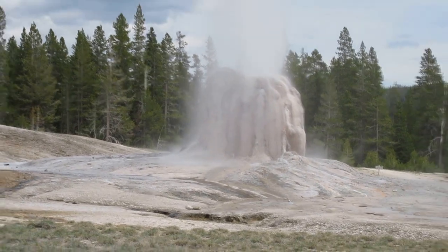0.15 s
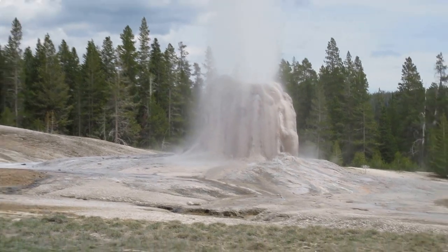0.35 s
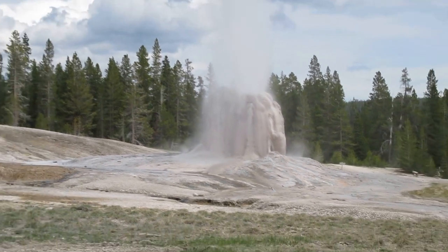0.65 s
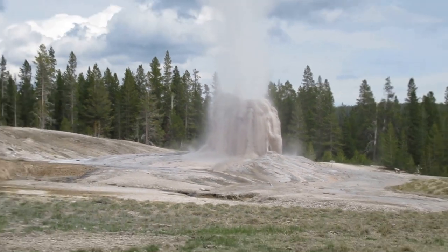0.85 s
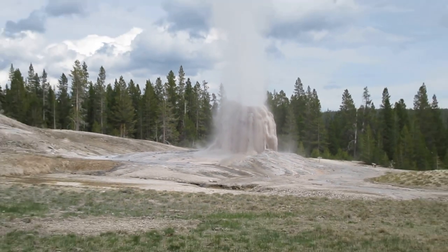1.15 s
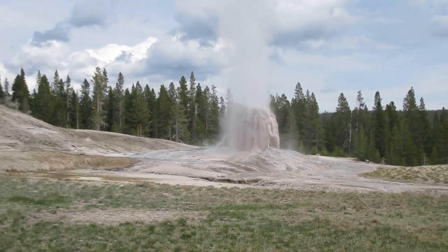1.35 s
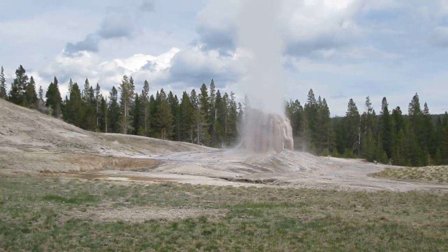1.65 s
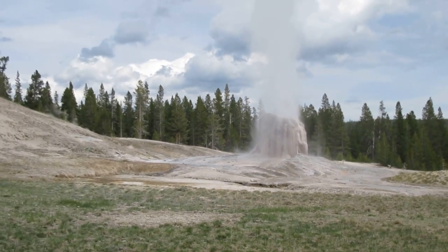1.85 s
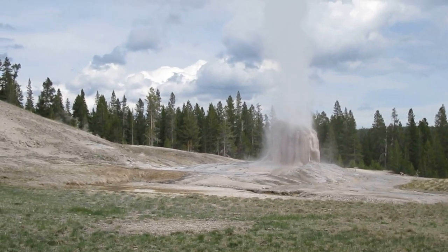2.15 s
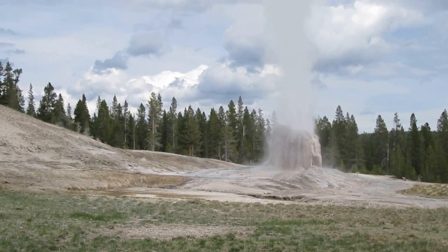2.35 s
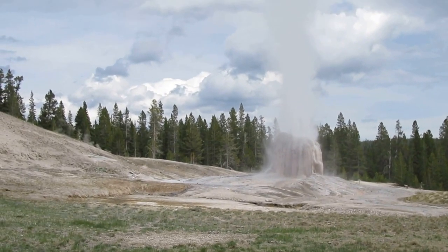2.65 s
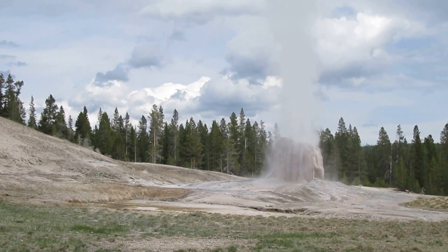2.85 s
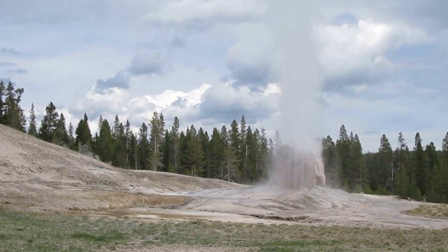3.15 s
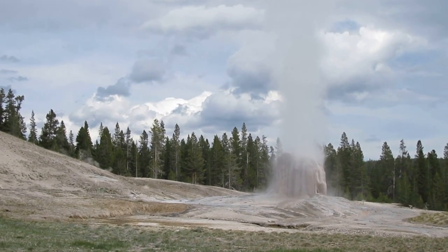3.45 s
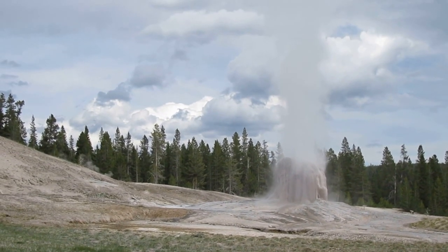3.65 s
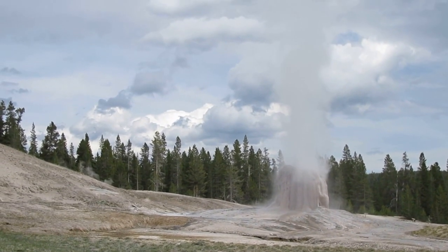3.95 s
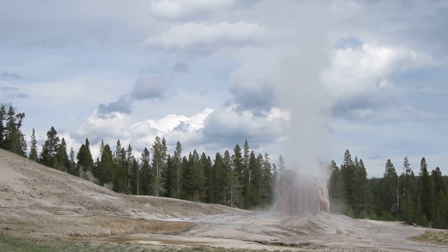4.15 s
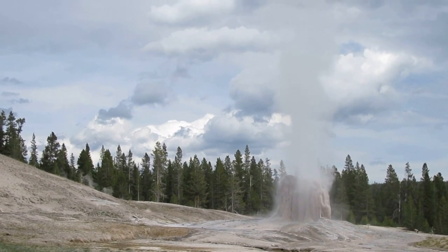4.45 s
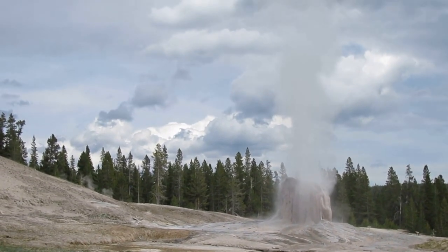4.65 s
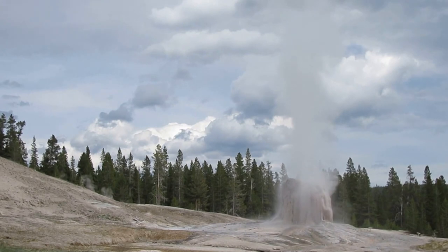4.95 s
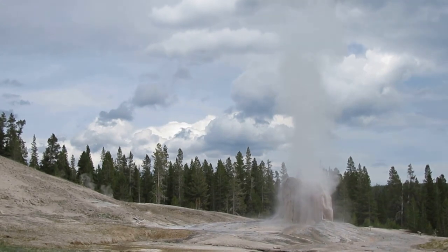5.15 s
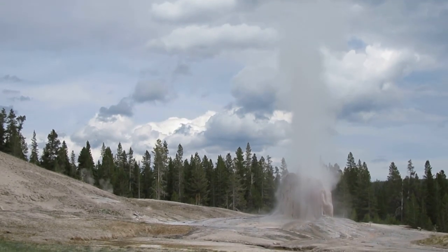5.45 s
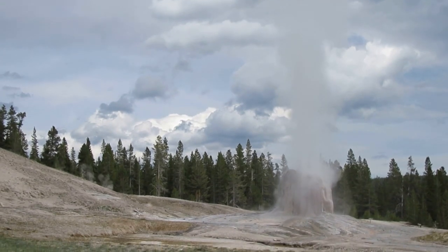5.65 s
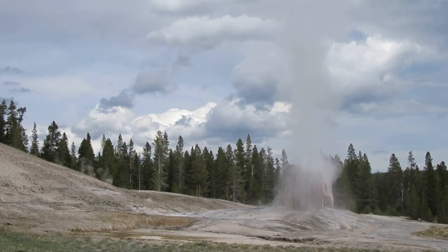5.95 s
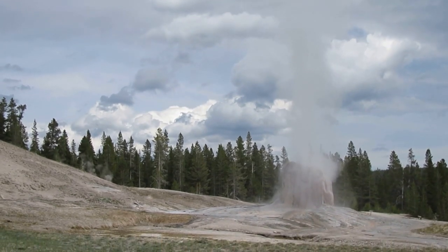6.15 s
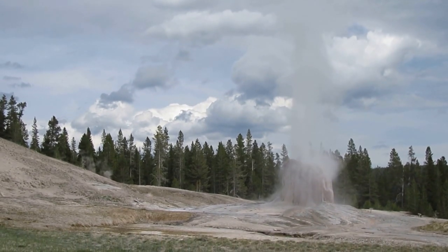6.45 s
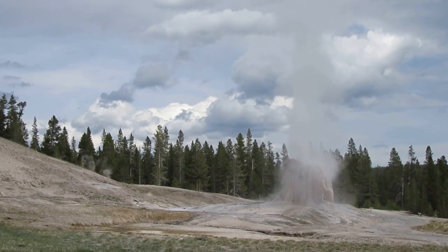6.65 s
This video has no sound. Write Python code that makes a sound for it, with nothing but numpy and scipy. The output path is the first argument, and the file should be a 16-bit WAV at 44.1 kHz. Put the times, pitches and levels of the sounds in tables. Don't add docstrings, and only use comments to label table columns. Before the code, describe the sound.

A geyser roars and hisses steadily outdoors, wind thumping the microphone early, one sharp handling click, then falling water spattering and splatting on rock.

```python
import sys
import numpy as np
from scipy import signal
from scipy.fft import rfft, irfft
from scipy.io import wavfile

SR = 44100
rng = np.random.default_rng(int(sys.argv[2]) if len(sys.argv) > 2 else 0)


def voltage_ratio(decibels):
    exponent = np.asarray(decibels, float) / 20
    return 10 ** exponent


def master_out(mix):
    frames = np.transpose(np.atleast_2d(mix))
    ceiling = np.clip(frames, -1, 1)
    pcm = np.round(ceiling * 32767).astype(np.int16)
    wavfile.write(sys.argv[1], SR, pcm)


N = 299880

WET_DB = -53


def rms_one(x):
    return x / np.sqrt(np.mean(x ** 2) + 1e-20)


def in_time(rows):
    s, *columns = np.transpose(rows)
    return [np.interp(np.arange(N) / SR, s, c) for c in columns]


def drift(rate):
    r = np.exp(-80 * np.pi * rate / SR)
    coarse = rng.standard_normal(N // 40 + 2002)
    slow = signal.lfilter([1], [1, -2 * r, r * r], coarse)[2000:]
    return np.interp(np.arange(N) / 40, np.arange(len(slow)), rms_one(slow))


def ring(clicks, hz, t60):
    r = voltage_ratio(-60 / (t60 * SR))
    w = 2 * np.pi * hz / SR
    return signal.lfilter([0, np.sin(w)], [1, -2 * r * np.cos(w), r * r], clicks + 1e-18)


def coloured(x, spectrum, shared_db, own_db, rate):
    octave = np.log2(np.maximum(np.fft.rfftfreq(N, 1 / SR), 1))
    hz, level_db = np.transpose(spectrum)
    shaped = rfft(x) * voltage_ratio(np.interp(octave, np.log2(hz), level_db, left=-90, right=-90))
    out = 0
    together = drift(rate)
    for centre in range(int(np.log2(hz[0])), int(np.log2(hz[-1])) + 2):
        band = irfft(shaped * np.maximum(1 - abs(octave - centre), 0), N)
        out = out + band * voltage_ratio(shared_db * together + own_db * drift(rate / 2))
    return rms_one(out)


def microphone_hiss():
    # f/Hz, density/dB
    noise_spectrum = [(5000, -24), (8000, -8), (11000, -10), (13500, -14), (14300, -11), (15000, -6)]
    return voltage_ratio(-68.5) * coloured(rng.standard_normal(N), noise_spectrum, shared_db=0.1, own_db=-1.5, rate=5)


def wind():
    # t/s, rumble level/dB
    gusts = [(0.0, -47), (0.3, -41), (0.47, -42), (0.62, -46.5), (0.92, -42), (1.4, -43), (1.76, -49.5),
             (2.35, -46.5), (2.56, -49.5), (3.1, -45), (3.54, -45.5), (3.73, -49), (3.86, -45.5),
             (4.62, -45.5), (5.13, -46), (5.45, -53), (6.8, -50)]
    # f/Hz, density/dB
    rumble_spectrum = [(12, -46), (20, -16), (70, -1), (118, 0.5), (190, -2.5), (214, -4), (274, -18.5),
                       (300, -32), (330, -28), (430, -73), (730, -120)]
    # t/s, signed height/full scale, f/Hz
    eddies = [(0.015, 0.017, 50), (.115, 0.019, 90), (.214, -0.015, 110), (0.267, 0.041, 86.5),
              (0.277, -0.049, 109), (.345, -0.021, 70), (0.386, -0.01, 62), (.42, 0.016, 80),
              (0.449, 0.037, 76), (0.476, -0.03, 75), (0.834, 0.05, 40), (0.8359, -0.13, 102),
              (0.869, -0.055, 154), (0.88, -0.029, 70), (0.904, 0.028, 80), (.935, -0.0064, 110),
              (0.964, 0.014, 60)]
    rumble = coloured(rng.standard_normal(N), rumble_spectrum, shared_db=1.0, own_db=0.7, rate=12.5)
    out = voltage_ratio(in_time(gusts)[0]) * rumble
    for s, height, hz in eddies:
        t = np.arange(N) / SR - s
        steep = 2.4 * height
        quicken = 3000 * height ** 2
        turn = 2 * np.pi * hz * (t + quicken * t * t / 2)
        swing = np.cos(turn) - steep * np.sin(2 * turn) - abs(steep) ** 1.55 * np.cos(3 * turn)
        out = out + height * np.exp(-(t * hz / 0.7) ** 2) * swing
    return out


def housing_click():
    # f/Hz, height of the ring/dB, t60/s
    modes = [(372, -39, 0.019), (960, -31, 0.02), (1200, -26.5, 0.017), (1650, -25, 0.013),
             (2270, -22.5, 0.021), (2760, -25, 0.012), (4400, -22, .012), (5220, -16.5, 0.006),
             (5800, -21, .008), (6620, -17.5, 0.0065), (7500, -30, 0.0047), (8700, -25, 0.0044),
             (10000, -26.5, 0.0038), (11300, -30, 0.0045), (13700, -26.5, .004)]
    slip_start_s, slip_gap_s, slip_swell_db = 1.4953, 0.00061, 2
    settle_s, settle_db = 1.5125, -12
    slips = np.arange(7)
    s = np.append(slip_start_s + slip_gap_s * slips, settle_s)
    peak_db = np.append(slip_swell_db * slips, settle_db)
    at = np.round(s * SR).astype(int)
    out = np.zeros(N)
    for hz, level_db, t60 in modes:
        strength = rng.uniform(0.34, 1.6, len(s)) * rng.choice([-1, 1], len(s))
        clicks = np.zeros(N)
        clicks[at] = voltage_ratio(peak_db) * strength
        rung = ring(clicks, hz, t60)
        out += voltage_ratio(level_db - 0.2) * rung / abs(rung).max()
    deaf = signal.butter(1, [3300, 3950], "bandstop", fs=SR, output="sos")
    return signal.sosfilt(deaf, out)


def throat(water_db, muffle_db):
    hz, t60 = 2745, 0.0063
    sung = ring(ring(rng.standard_normal(N), hz, t60), hz, t60)
    level_db = -54.5 + 0.6 * (water_db - WET_DB) - 2.8 * muffle_db + 2.6 * drift(5.5)
    return voltage_ratio(level_db) * rms_one(sung)


def slap(hz, cycles):
    turns = np.arange(-60, 61) / SR * hz
    return np.exp(-(turns / cycles) ** 2) * np.cos(2 * np.pi * turns + 2.15)


def splats():
    # t/s, peak level/dB, f/Hz
    lumps = [(1.7773, -33, 6490), (1.8235, -37, 10500), (1.8591, -34, 4860), (2.0452, -32, 5350),
             (3.275, -31, 4860), (3.4221, -31, 5350), (4.0866, -29, 4860), (4.1585, -26.5, 9540),
             (4.1994, -30.5, 5890), (4.2312, -27, 3640), (4.3063, -35, 9540), (4.342, -31, 7860),
             (4.3725, -25, 4860), (4.4185, -28.5, 9500), (4.6695, -31, 7860), (4.704, -30, 9540),
             (4.7334, -26, 4010), (4.8173, -26, 5350), (4.9385, -21.5, 4860), (4.9731, -28, 3640),
             (5.1538, -29.5, 7800), (5.5016, -29, 8660), (5.7726, -30.5, 7140), (5.8461, -37.5, 8660),
             (5.97, -32, 7140), (6.0758, -35, 8660), (6.0942, -22, 7060), (6.1626, -32, 7800),
             (6.3041, -35, 8660), (6.6719, -32, 3300)]
    # t/s, peak level/dB, f/Hz, length/cycles
    plops = [
        (4.5736, -23, 4010, 1.5),
    ]
    soft_db, hard_db = -37, -27
    soft_cycles, hard_cycles = 1.5, 0.6
    rows = []
    for s, db, hz in lumps:
        rows.append((s, db, hz, np.interp(db, [soft_db, hard_db], [soft_cycles, hard_cycles])))
    out = np.zeros(N)
    for s, peak_db, hz, cycles in rows + plops:
        big = np.clip((peak_db + 34) / 6, 0, 1)
        bright = np.clip((hz - 5500) / 1500, 0, 1.4)
        body = slap(4400, 0.65) * big * bright
        start = round(s * SR) - 62
        out[start:start + 121] += voltage_ratio(peak_db - 1.5 + 3.8 * big) * (slap(hz, cycles) + body)
    distance = signal.butter(3, 10500, fs=SR, output="sos")
    return signal.sosfilt(distance, out + 1e-18)


def spatter(water_db):
    # f/Hz, density/dB
    spatter_spectrum = [(900, -25), (1600, -8), (2200, 0.5), (2750, 2), (3150, 2.5), (3700, 2), (4300, 2),
                        (6000, -3.5), (8300, -13.5), (15000, -38)]
    sizes = voltage_ratio(3.3 * np.minimum(rng.exponential(1, N), 4.6)) * rng.choice([-1, 1], N)
    drops_per_s = 9000 * voltage_ratio(drift(40))
    landed = rng.random(N) < drops_per_s / SR
    sizzle = coloured(sizes * landed, spatter_spectrum, shared_db=-1.0, own_db=-0.6, rate=9.6)
    return voltage_ratio(water_db + 4.5) * sizzle


def jet(force_db, mist_db, muffle_db):
    # f/Hz, density/dB
    roar_spectrum = [(160, -16), (280, -10.5), (400, -9), (620, -1), (845, -4), (970, -3), (1300, -7),
                     (1600, -10), (2100, -18), (3000, -48)]
    # f/Hz, density/dB
    rush_spectrum = [(1200, -29), (1650, -11), (1950, -3), (2250, -0.5), (2520, -4.5), (2800, -6.5),
                     (3050, -13.5), (3450, -23), (4300, -31)]
    # f/Hz, density/dB
    hiss_spectrum = [(3300, -59), (4050, -12), (4400, -3.5), (5100, 1), (6400, -2), (7400, -6),
                     (10500, -17), (12900, -23.5), (15000, -31.5)]
    roar = coloured(rng.standard_normal(N), roar_spectrum, shared_db=0.5, own_db=0.5, rate=16)
    rush = coloured(rng.standard_normal(N), rush_spectrum, shared_db=1.18, own_db=-0.5, rate=32)
    hiss = coloured(rng.standard_normal(N), hiss_spectrum, shared_db=0.85, own_db=0.5, rate=36)
    roar_db = -46 + force_db
    rush_db = -49 + force_db + 0.47 * mist_db - muffle_db
    hiss_db = -51 + mist_db + 0.076 * force_db
    return voltage_ratio(roar_db) * roar + voltage_ratio(rush_db) * rush + voltage_ratio(hiss_db) * hiss


def scene():
    # t/s, force level/dB, level of mist torn off/dB
    column = [(0.0, 2, 1.5), (0.44, 2, 2.5), (0.81, 2.5, -0.5), (1.1, 1.6, -3), (1.38, 3.5, -0.6),
              (1.72, 1.2, -0.3), (2.18, 0.1, 0.6), (2.69, 0, 2.5), (3.29, 0.3, 1), (4.0, -0.8, -1),
              (4.83, -2.5, 3), (5.3, -2, 2.5), (6.17, -1.5, 0), (6.34, -1.1, -4.5), (6.8, -0.5, -8)]
    # t/s, level/dB
    falling = [(0.0, -71), (1.72, -79), (2.18, -65), (2.8, -56.5), (4.0, -53), (4.83, -48), (5.21, -49.5),
               (5.72, -48), (6.24, -47), (6.4, -49.5), (6.8, -52)]
    force_db, mist_db = in_time(column)
    water_db, = in_time(falling)
    muffle_db = 0.78 * np.maximum(water_db - WET_DB, 0)

    near = microphone_hiss() + wind() + housing_click()
    water = throat(water_db, muffle_db) + splats() + spatter(water_db)
    mono = near + water + jet(force_db, mist_db, muffle_db)
    return np.stack([mono, mono])


def band_limit(x):
    return signal.sosfilt(signal.butter(12, 16090, fs=SR, output="sos"), x)


def record(dry):
    top_cut = signal.cheby2(12, 45, 15600, fs=SR, output="sos")
    return band_limit(signal.sosfilt(top_cut, dry))


dry = scene()
out = record(dry)
master_out(out)
```